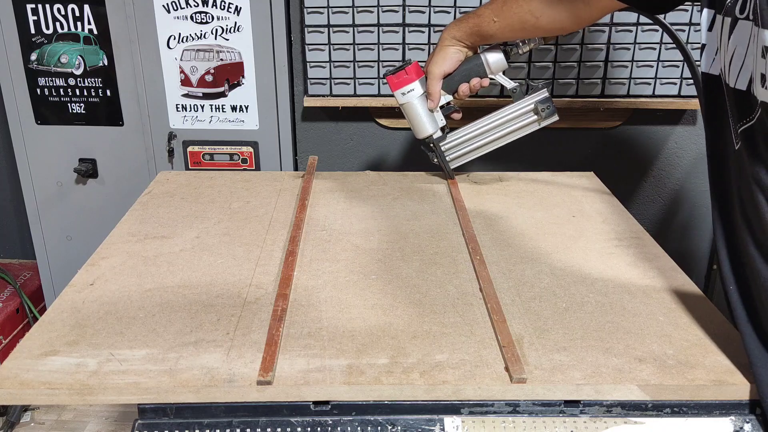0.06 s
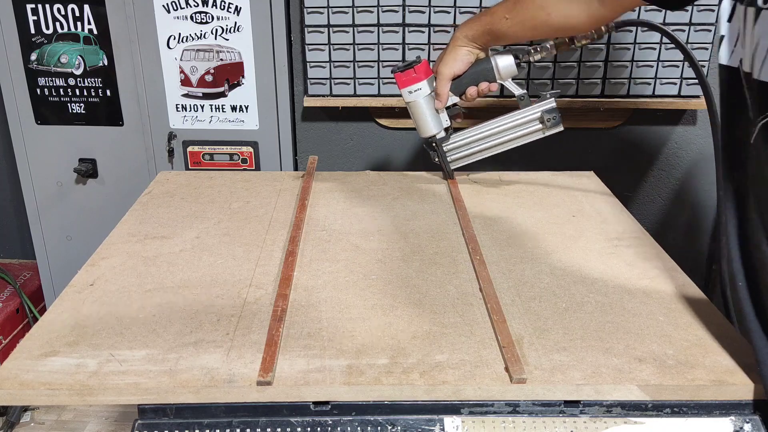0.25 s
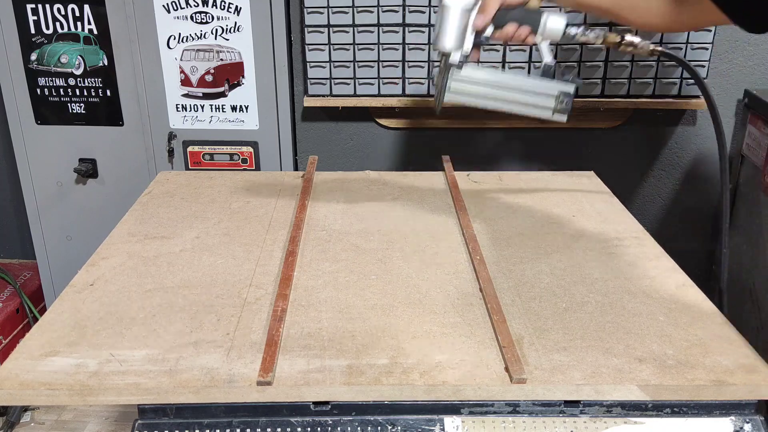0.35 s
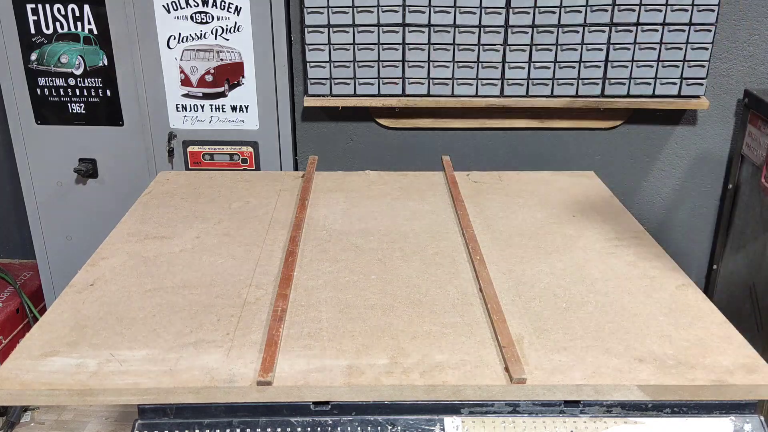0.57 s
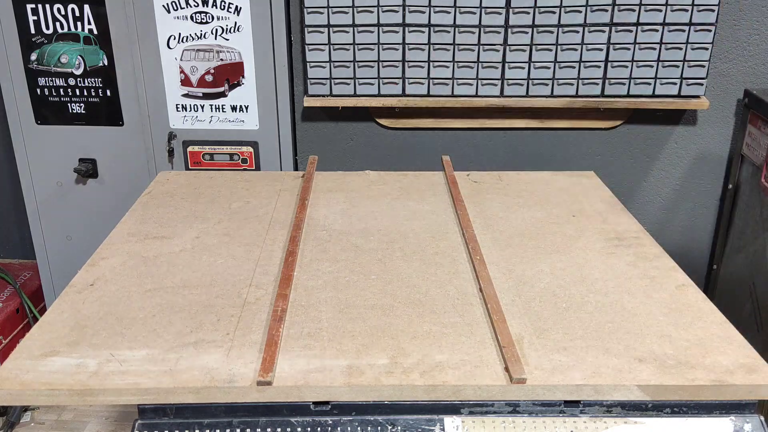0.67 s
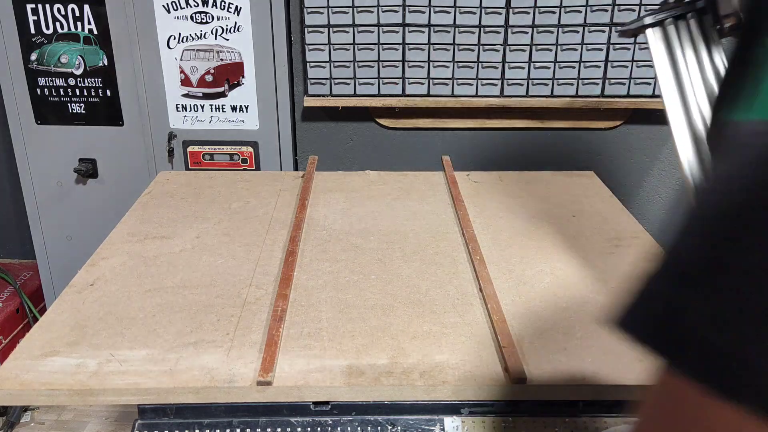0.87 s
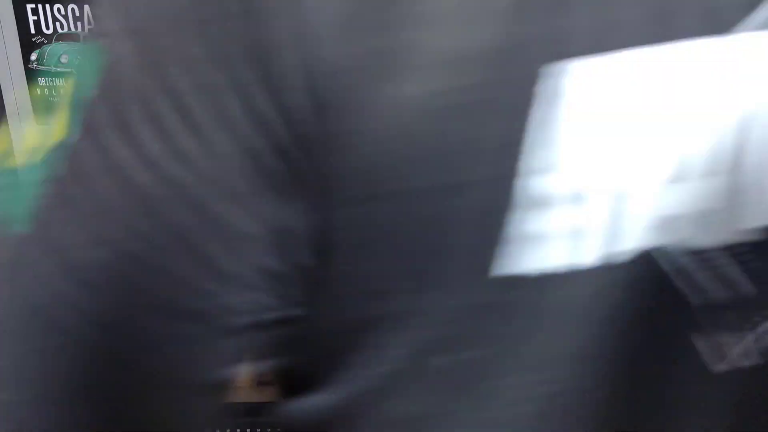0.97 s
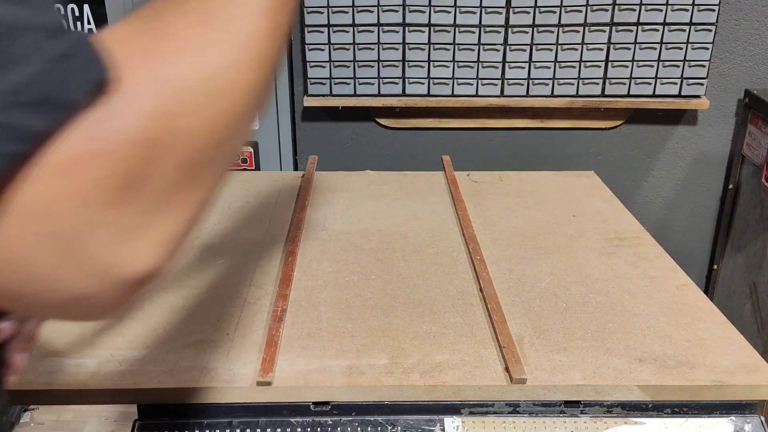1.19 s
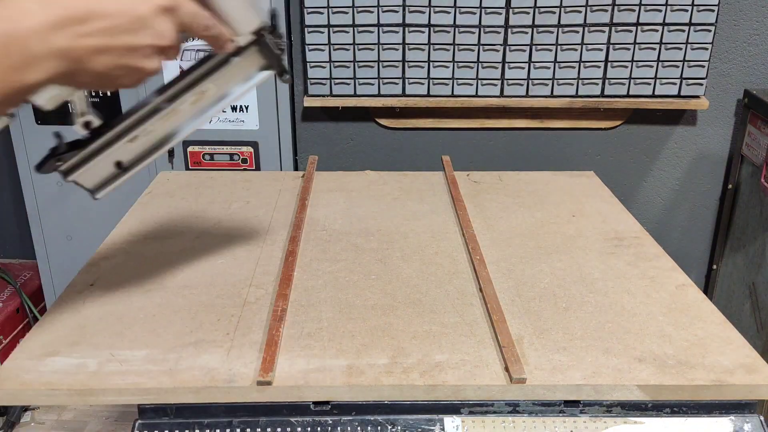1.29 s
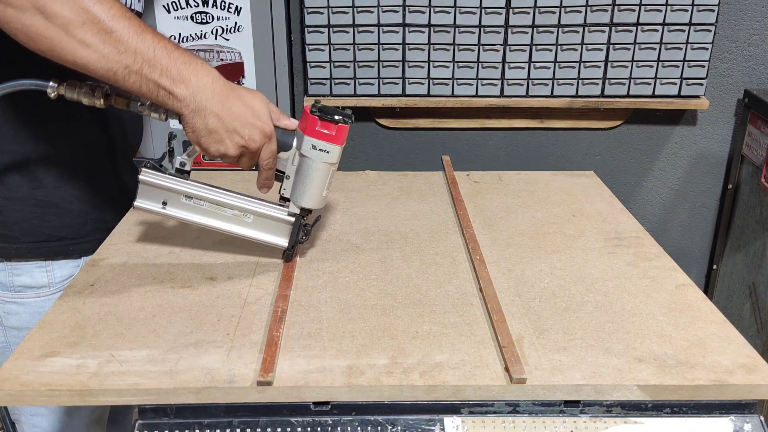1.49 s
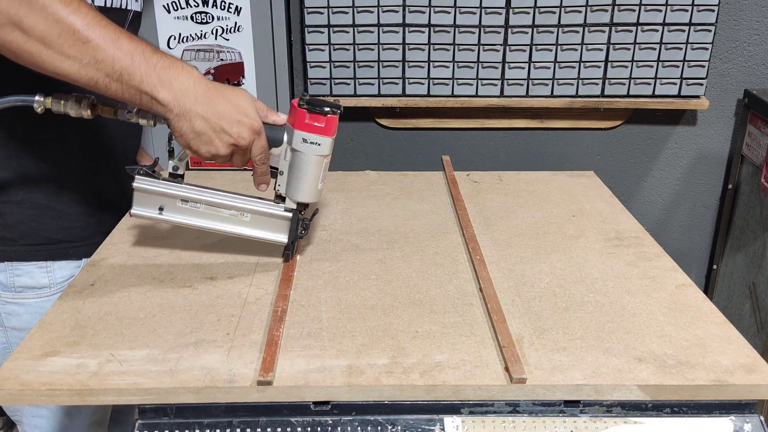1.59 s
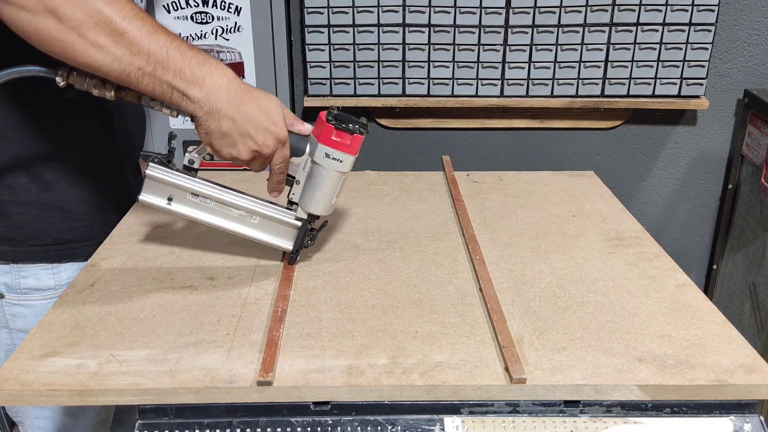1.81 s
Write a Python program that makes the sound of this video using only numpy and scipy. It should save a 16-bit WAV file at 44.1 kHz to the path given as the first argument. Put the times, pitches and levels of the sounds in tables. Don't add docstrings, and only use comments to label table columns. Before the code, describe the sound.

One loud, close nail gun shot snaps into a wooden board with a short air blast and low boom, followed by faint leak hiss, rubber hose dragging and a light final bump, in a briefly echoing shop.

```python
import sys
import numpy as np
from scipy import signal
from scipy.fft import rfft, irfft
from scipy.io import wavfile
from scipy.ndimage import uniform_filter1d

SR = 44100
rng = np.random.default_rng(int(sys.argv[2]) if len(sys.argv) > 2 else 0)


def elevation(decibels):
    levels = np.asarray(decibels, float)
    return 10 ** (levels / 20)


def file_out(sig):
    cols = np.atleast_2d(sig).T
    lim = np.clip(cols, -1, 1)
    pcm = np.round(lim * 32767).astype(np.int16)
    wavfile.write(sys.argv[1], SR, pcm)


N = 81585
T = np.arange(N) / SR
HZ = np.fft.rfftfreq(N, 1 / SR)


def evened(x):
    return x / np.sqrt(np.mean(x ** 2) + 1e-20)


def read(points, hz=HZ):
    point_hz, value = np.transpose(points)
    return np.interp(np.log(hz + 1), np.log(point_hz + 1), value)


def colour(x, points):
    return irfft(rfft(x) * elevation(read(points)), N)


# (pitch [Hz], likeness [0-1])
LIKENESS = [(60, 1), (180, 0.87), (550, 0.46), (1650, 0.044), (4970, 0.056), (15000, 0.01)]


def pair(x):
    left, other = rfft(x[0]), rfft(x[1])
    same = np.clip(read(LIKENESS), 0, 1)
    right = same * left + np.sqrt(1 - same ** 2) * other
    return irfft(np.array([left, right]), N)


def noise_pair():
    return pair(rng.standard_normal((2, N)))


def air(tone, flutter_db, flutter_s):
    wobble = evened(uniform_filter1d(rng.standard_normal(N), max(round(flutter_s * SR), 1)))
    return evened(colour(noise_pair(), tone) * elevation(flutter_db * wobble))


def burst(start, rise, hold, t60, sag_db=0):
    t = T - start
    attack = np.clip(t / rise, 0, 1) ** 2
    sag = sag_db * np.clip((t - rise) / (hold + 1e-9), 0, 1)
    fall = 60 * np.clip(t - rise - hold, 0, 2) / t60
    return attack * elevation(sag - fall)


def bell(centre, length):
    return np.exp(-.5 * ((T - centre) / length) ** 2)


def resonate(x, hz, width):
    r = np.exp(-np.pi * width / SR)
    turn = 2 * np.pi * hz / SR
    return signal.lfilter([1 - r * r], [1, -2 * r * np.cos(turn), r * r], x) * np.sin(turn)


def thud(start, db, hz, t60):
    t = np.maximum(T - start, 0)
    return -elevation(db - 60 * t / t60) * np.sin(2 * np.pi * hz * t) * np.minimum(t * hz * 2, 1)


def shot():
    hits = blow() + board() + chamber()
    return valve() + exhaust() + hits + snaps() + rattle()


BLOW_S = .2545


def blow():
    return thud(BLOW_S, -4, hz=700, t60=.0045)


# (time [s], level [dB])
SNAPS = [
    (.2588, -4),
    (.2678, -8),
    (.2762, 2),
]


def snaps():
    return sum(-thud(s, db, hz=2000, t60=.002) for s, db in SNAPS)


# (pitch [Hz], width [Hz], level [dB])
BODY = [(350, 21, -20), (766, 17, 3), (900, 33, -8), (1135, 60, 1), (1277, 38, -3), (1726, 120, 11.5),
        (2316, 33, 5), (3020, 200, 0), (4055, 120, 2.5), (4387, 89, 8.5), (4750, 120, 4), (5550, 400, 2),
        (6460, 180, -5.5), (8850, 80, -12)]
# (pitch [Hz], level [dB])
CRACK = [(100, -31), (600, -28), (1000, 9), (2000, 4), (4500, 11), (6500, 0), (7500, 2), (12000, -20)]
RATTLE_S, RATTLE_DB, CLICKS_PER_S = .2532, -18.5, 4000
RETURN_S, RETURN_DB = .334, -15.5


def rattle():
    sizes = elevation(2.5 * np.minimum(rng.exponential(1, N), 2))
    hit = rng.random(N) < CLICKS_PER_S / SR
    clicks = pair(rng.standard_normal((2, N)) * (0.69 + hit * sizes))
    firing = burst(RATTLE_S, rise=.0045, hold=.014, t60=0.097)
    landing = elevation(RETURN_DB) * burst(RETURN_S, rise=0.0061, hold=0.002, t60=0.066)
    clicks = clicks * (firing + landing)
    body = sum(elevation(db) * resonate(clicks, hz, width) / np.sqrt(width / SR) for hz, width, db in BODY)
    crack = colour(clicks, CRACK) * np.clip((T - RATTLE_S) / .001, 0, 1)
    return elevation(RATTLE_DB) * (0.16 * body + elevation(-2) * crack)


# (pitch [Hz], level [dB])
VALVE_TONE = [(200, -17), (1800, -9), (3200, 3), (4800, 5), (6500, -4), (9000, -14), (11500, -5.5),
              (15000, -19)]


def valve():
    puff = air(VALVE_TONE, flutter_db=1.4, flutter_s=.001)
    return elevation(-18) * puff * burst(.2378, rise=.003, hold=0.0048, t60=0.023)


# (pitch [Hz], level [dB])
EXHAUST_TONE = [(150, -11), (600, -8), (1100, 0.5), (2300, 4), (4500, 2), (8500, -3), (11500, -1),
                (15500, -9.5)]
EXHAUST_S = 0.2645


def exhaust():
    rush = air(EXHAUST_TONE, flutter_db=2.0, flutter_s=0.00071)
    return elevation(-16) * rush * burst(EXHAUST_S, rise=0.016, hold=0.037, t60=.06, sag_db=-4.5)


CHAMBER_HZ, CHAMBER_END_HZ, CHAMBER_WIDTH_HZ, CHAMBER_DB = 1173, 1170, 250, -24


def chamber():
    early, late = [evened(resonate(rng.standard_normal((2, N)), hz, CHAMBER_WIDTH_HZ))
                   for hz in (CHAMBER_HZ, CHAMBER_END_HZ)]
    fade = np.clip((T - .33) / 0.071, 0, 1) * np.pi / 2
    hum = np.cos(fade) * early + np.sin(fade) * late
    return elevation(CHAMBER_DB) * hum * burst(EXHAUST_S, rise=0.022, hold=0.016, t60=0.22)


# (pitch [Hz], width [Hz], level [dB], time to fall 60 dB [s])
BOARD = [
    (61, 22, -63, 0.97),
    (95, 6.9, -34, 0.41),
    (135, 50, -45.5, 1),
    (300, 136, -30.5, 0.15),
]


def board():
    shake = noise_pair()
    return sum(elevation(db) * evened(resonate(shake, hz, width)) * burst(BLOW_S, .025, 0.0089, t60)
               for hz, width, db, t60 in BOARD)


# (time [s], level [dB], centre pitch [Hz], length [s])
SHUFFLES = [(0.245, -43.5, 203, 0.01), (0.329, -41.5, 130, 0.0092), (0.386, -51, 150, 0.021),
            (0.453, -48, 257, .015), (.55, -51.5, 201, 0.01), (0.584, -64, 450, .02),
            (0.736, -49.5, 750, .0025), (0.74, -46.5, 170, 0.0046), (0.905, -57.5, 510, .03),
            (1.061, -50, 300, 0.0074), (1.178, -47.5, 270, 0.019), (1.309, -52, 367, 0.017),
            (1.62, -58, 350, 0.043), (1.76, -50, 145, 0.027), (1.779, -50, 695, 0.0073),
            (1.808, -52, 171, 0.011)]
# (time [s], level [dB], pitch [Hz], length [s])
HUM = [
    (0.16, -54.5, 180, 0.043),
    (.5, -58.5, 140, 0.049),
]
# (time [s], level [dB], pitch [Hz], length [s])
KNOCKS = [
    (1.7733, -28, 165, .0035),
    (1.7803, -35, 260, .0018),
    (1.7878, -35, 165, .0035),
]


def knocks():
    shake, out = noise_pair(), np.zeros((2, N))
    for s, db, hz, length in SHUFFLES:
        bump = colour(shake, [(hz / 4, -14), (hz / 1.3, 0), (hz * 1.48, 0), (hz * 3, -8), (hz * 6, -35)])
        out += elevation(db) * evened(bump) * bell(s, length)
    for s, db, hz, length in HUM:
        out += elevation(db) * evened(resonate(shake, hz, 31)) * bell(s, length)
    for s, db, hz, length in KNOCKS:
        out += elevation(db) * np.sin(2 * np.pi * hz * (T - s)) * bell(s, length)
    return out


# (time [s], level [dB], brightness [dB])
DRAG = [(.69, -59, 0), (.735, -45, 8.5), (.76, -43.5, 3), (.8, -40.5, 2.5), (.85, -42, 1), (.93, -44, -0.5),
        (1.0, -43, -0.5), (1.06, -43.5, -4), (1.13, -42, -4.5), (1.155, -39.5, 0.5), (1.176, -36.5, -1),
        (1.2, -43.5, -1.5), (1.225, -46.5, 3), (1.27, -52, 12), (1.35, -59.5, 20), (1.38, -65, -5)]
# (pitch [Hz], level [dB])
DRAG_TONE = [(200, -11), (700, -5.5), (1700, 1.5), (2600, 1), (4500, 2.5), (7000, -4), (12000, -3)]


def drag():
    t, db, bright_db = np.transpose(DRAG)
    rub = air(DRAG_TONE, flutter_db=.9, flutter_s=0.0077)
    tilt_db = np.interp(T, t, bright_db)
    low = colour(rub, [(2200, 1), (4500, -31)])
    top = colour(rub, [(6000, -21), (9000, 2)])
    tilted = rub + low * (elevation(-tilt_db) - 1) + top * (elevation(.7 * tilt_db) - 1)
    return tilted * elevation(np.interp(T, t, db, -120, -120))


# (pitch [Hz], level per Hz [dB])
LEAK_TONE = [(70, 2), (200, 3), (450, -4), (1100, -5), (3300, -1.5), (4400, 4), (5200, 0), (12000, -1.5)]
# (time [s], level [dB])
LEAK_LEVEL = [(0, -42.5), (.2, -43.5), (.5, -44), (.7, -44), (1.3, -43), (1.5, -43), (1.85, -42.5)]
DROPOUT_S, DROPOUT_DB, DROPOUT_BACK_S = 1.363, -23, 0.003


def leak():
    t, db = np.transpose(LEAK_LEVEL)
    recovery = np.exp(-np.maximum(T - DROPOUT_S, 0) / DROPOUT_BACK_S)
    gap = DROPOUT_DB * (T > DROPOUT_S) * recovery
    return air(LEAK_TONE, flutter_db=1.0, flutter_s=.03) * elevation(np.interp(T, t, db) + gap)


# (pitch [Hz], time to fall 60 dB [s])
SHOP = [(100, 0.26), (500, 0.13), (1200, 0.13), (4000, 0.18), (12000, 0.15)]


def shop(x):
    taps = np.zeros((2, SR // 2))
    at = np.arange(200, SR // 2 - 20, 20) + rng.integers(0, 20, (2, (SR // 2 - 201) // 20))
    np.put_along_axis(taps, at, rng.choice([-1., 1.], at.shape), 1)
    hz, t, z = signal.stft(taps, SR, nperseg=256)
    decay = elevation(-60 * t / read(SHOP, hz)[:, None])
    tail = signal.istft(z * decay, SR, nperseg=256)[1]
    wet = signal.fftconvolve(x, tail / np.linalg.norm(tail[0]), axes=1)[:, :N]
    return pair(wet)


def scene():
    near, bumps = shot(), knocks()
    echo = elevation(-9) * shop(near + elevation(-10) * bumps)
    return near + bumps + echo + leak() + drag()


def low_pass(x):
    return signal.sosfilt(signal.butter(12, 16860, fs=SR, output="sos"), x)


# (pitch [Hz], level [dB])
LEAN = [(200, 0.5), (1300, -1), (4400, 0), (7000, -16), (8500, 21), (11000, 5.5), (15000, 3.5)]
# (pitch [Hz], level [dB])
MIC = [(25, -17), (75, -1.5), (6700, 0.5), (7100, -7), (8400, -6), (10150, -17.5), (10450, 4), (15700, 5.5)]
# (pitch [Hz], level [dB])
EDGE = [(15760, 0), (15900, -42), (16500, -44), (16800, -60)]
LIMIT = 0.97


def record(dry):
    lean = read(LEAN) / 2
    x = irfft(rfft(dry) * elevation(np.array([lean, -lean])), N)
    x = x / (1 + (abs(x) / LIMIT) ** 4) ** .25
    mix = colour(colour(x, MIC), EDGE)
    return low_pass(mix)


dry = scene()
out = record(dry)
file_out(out)
```